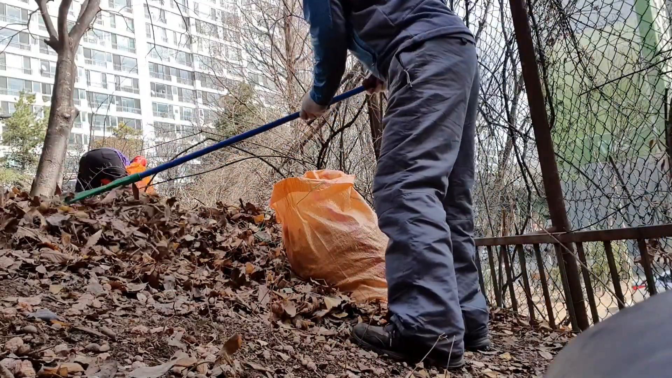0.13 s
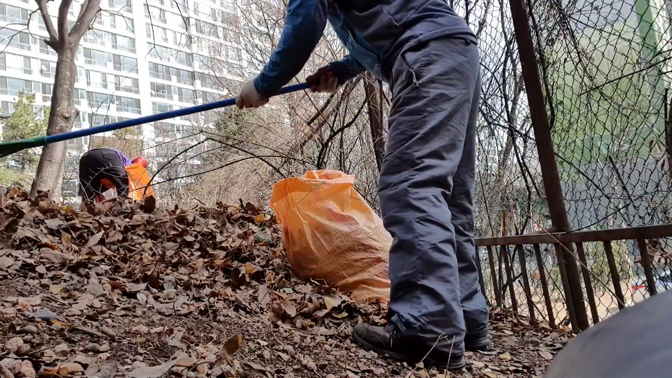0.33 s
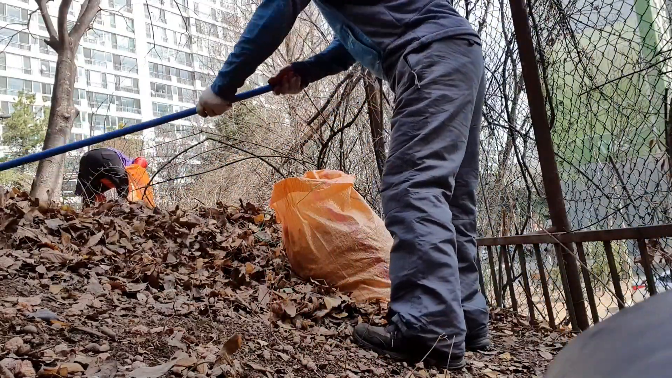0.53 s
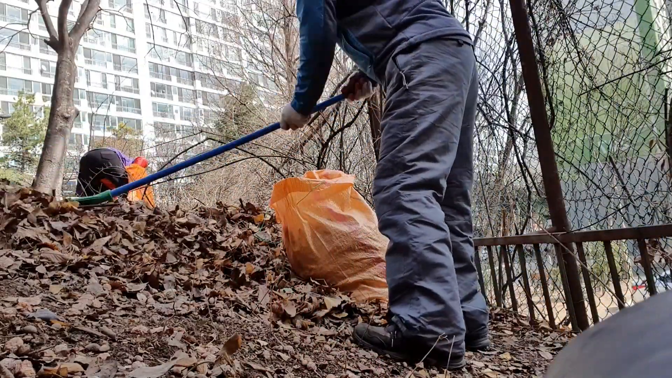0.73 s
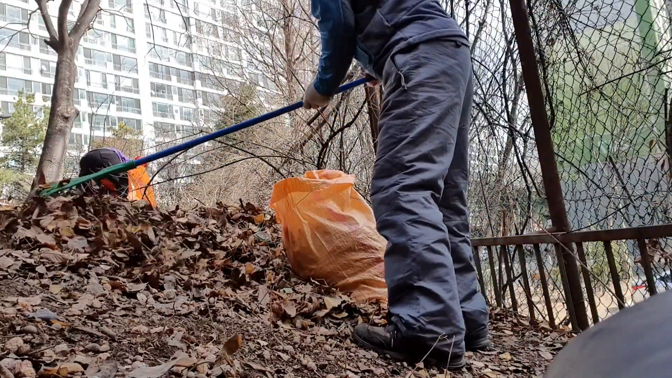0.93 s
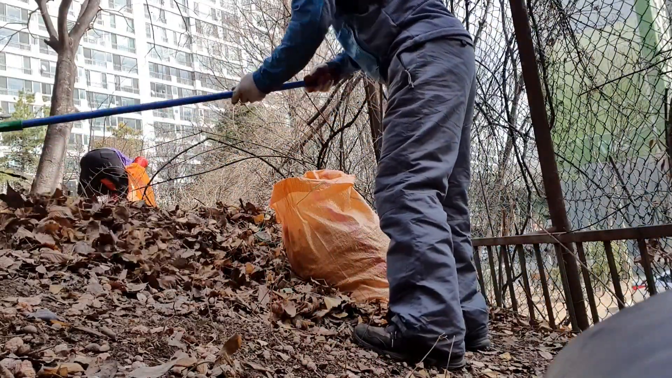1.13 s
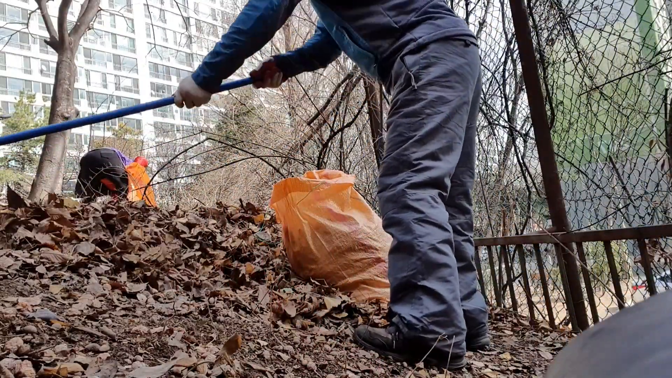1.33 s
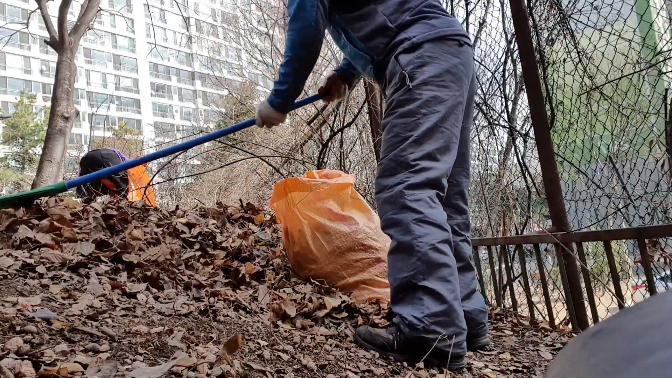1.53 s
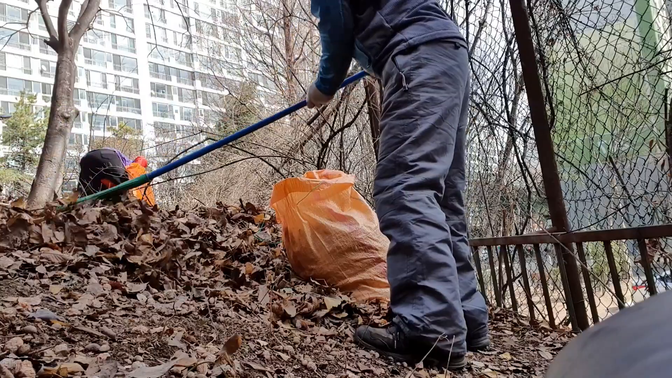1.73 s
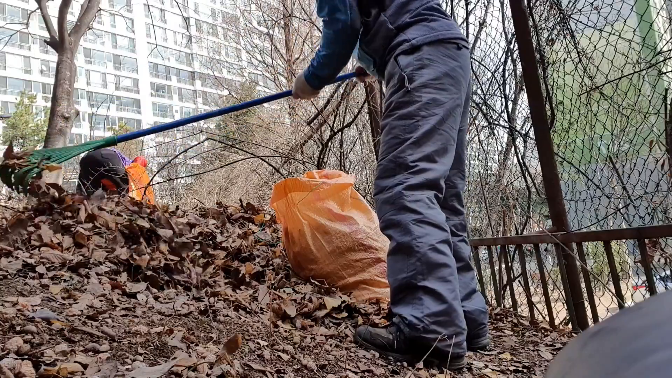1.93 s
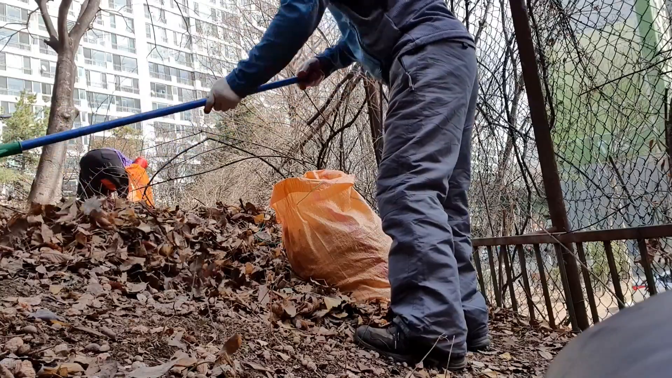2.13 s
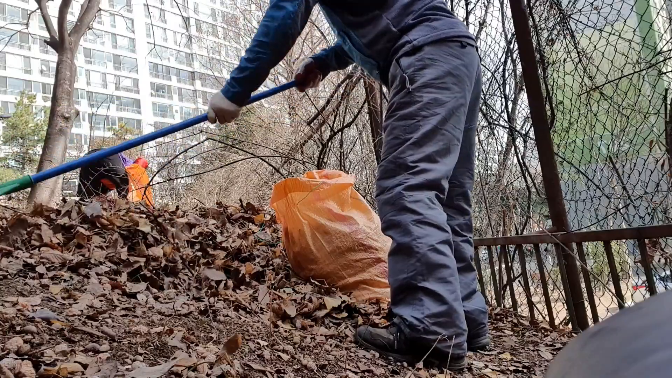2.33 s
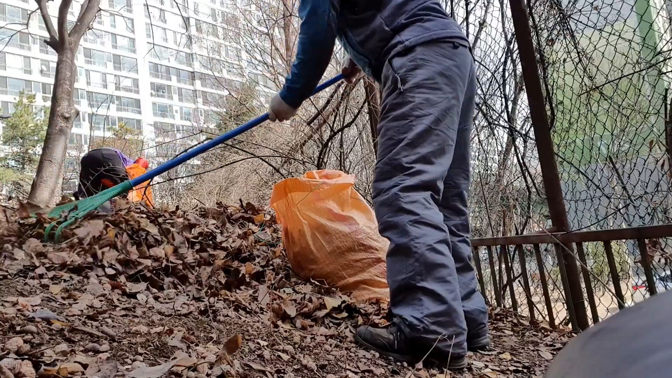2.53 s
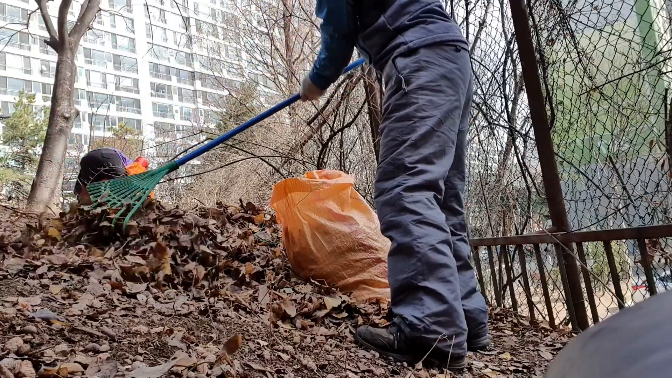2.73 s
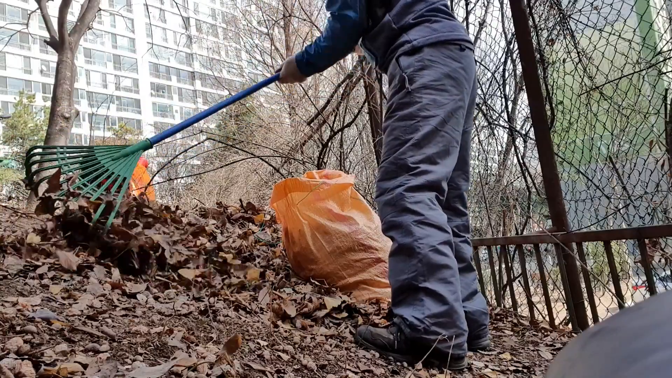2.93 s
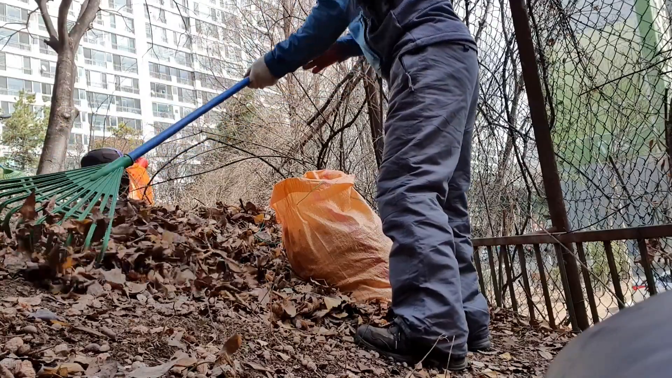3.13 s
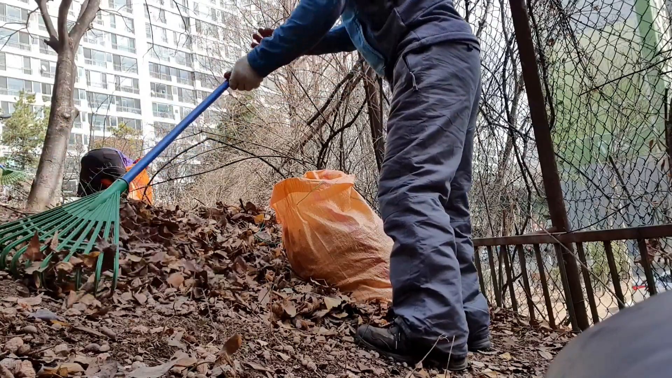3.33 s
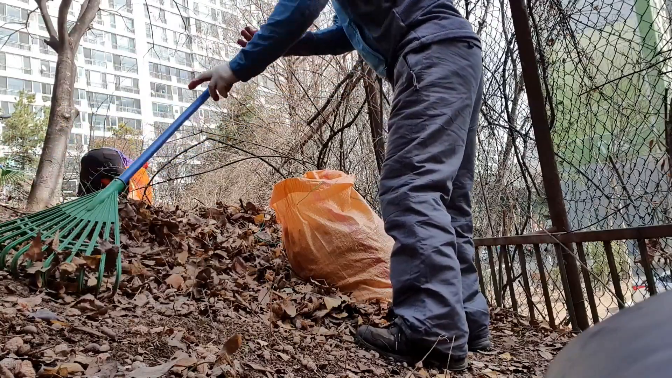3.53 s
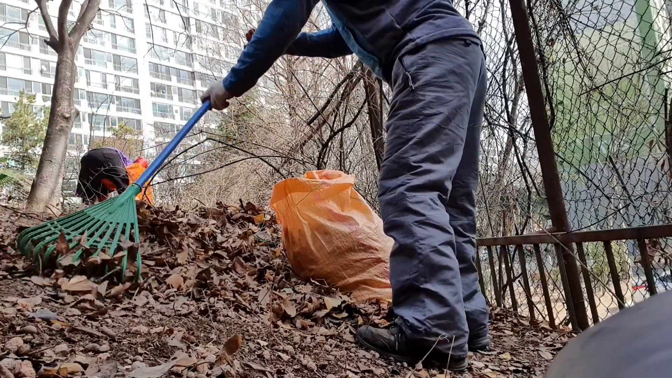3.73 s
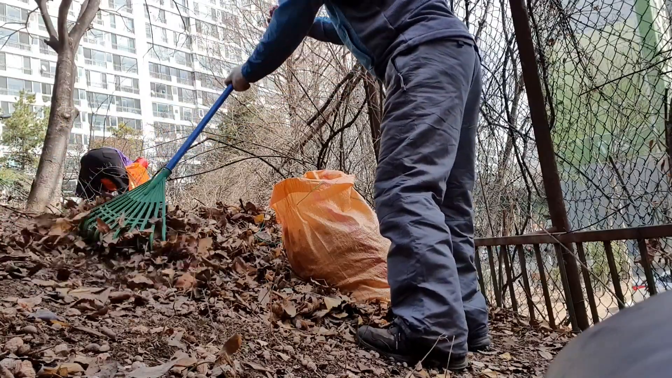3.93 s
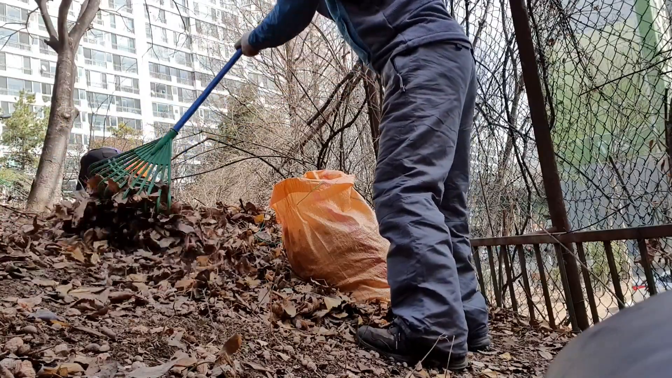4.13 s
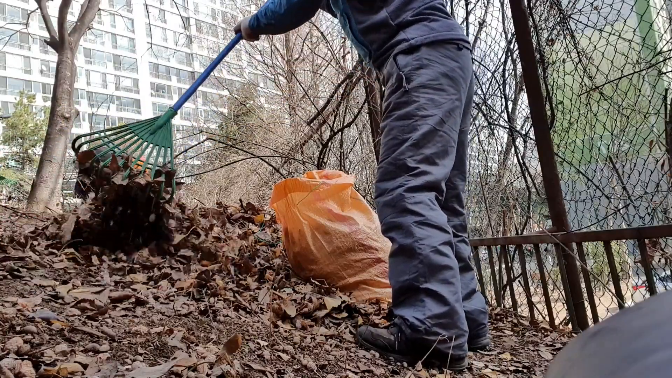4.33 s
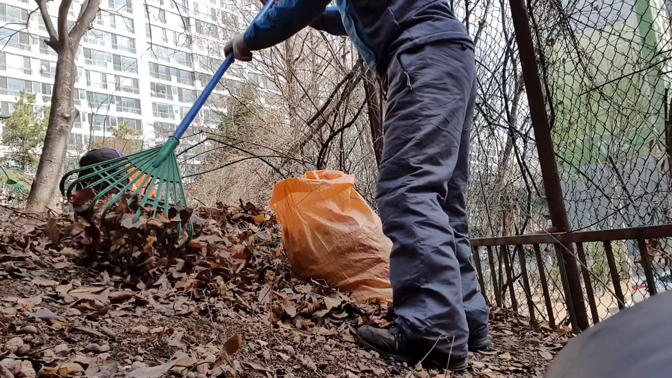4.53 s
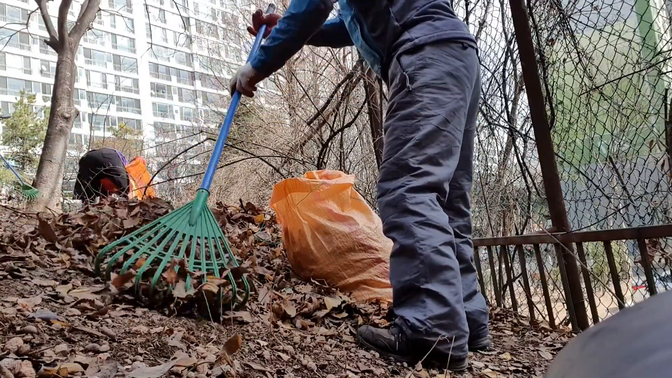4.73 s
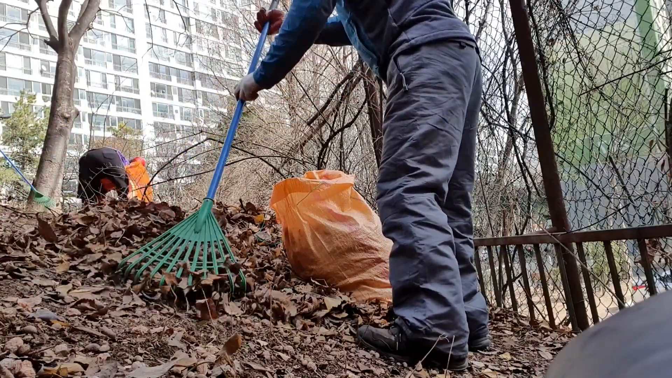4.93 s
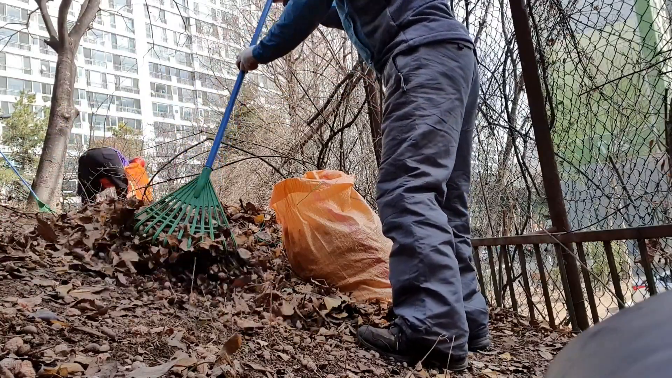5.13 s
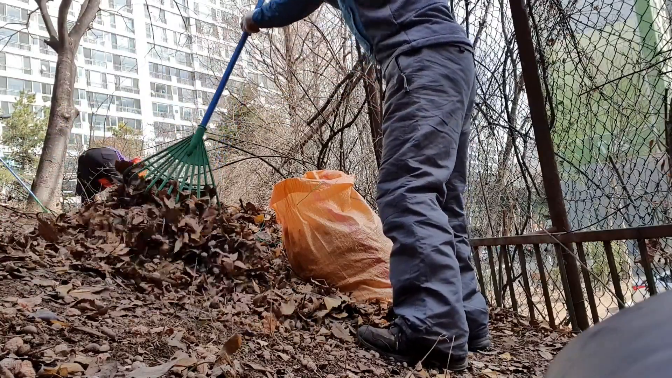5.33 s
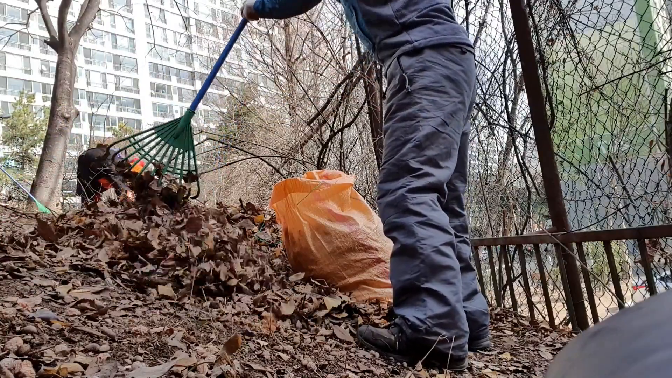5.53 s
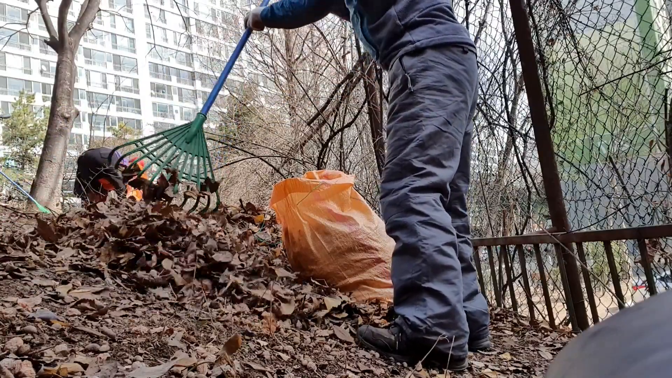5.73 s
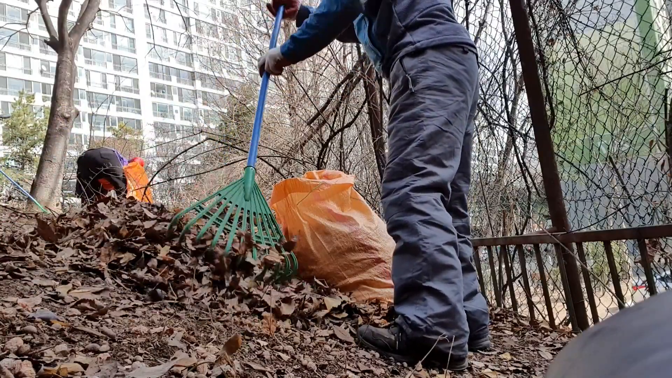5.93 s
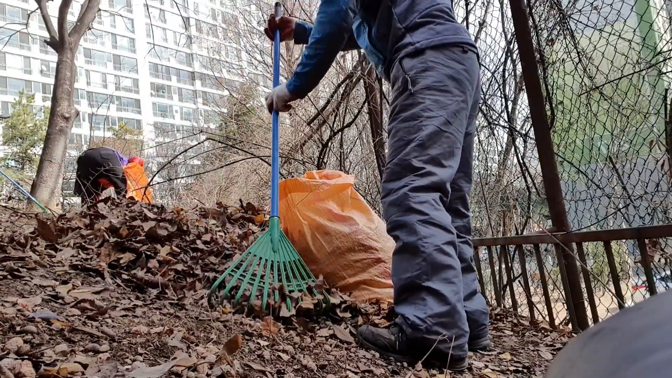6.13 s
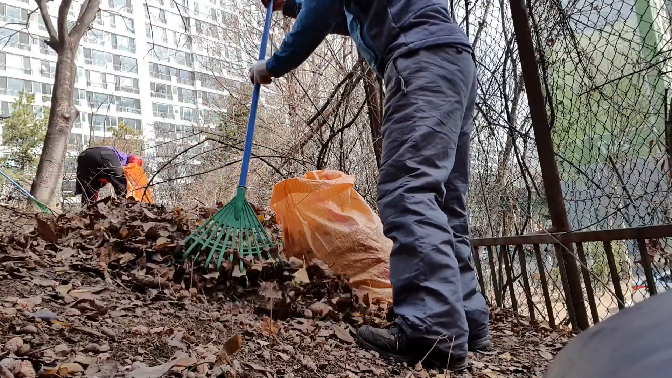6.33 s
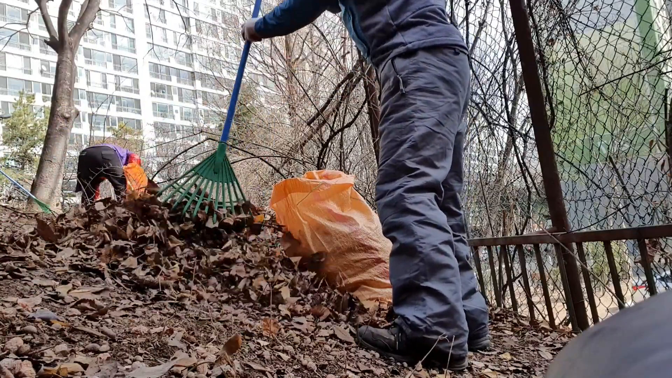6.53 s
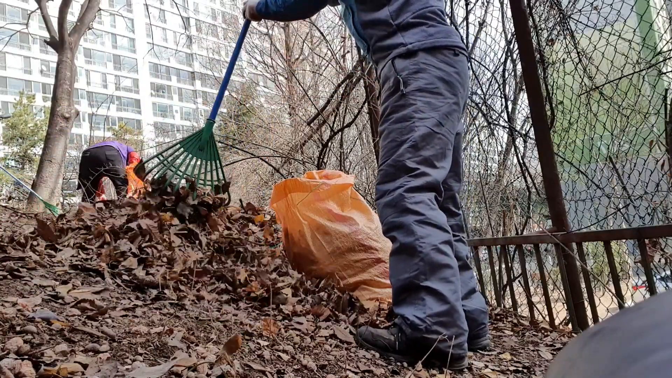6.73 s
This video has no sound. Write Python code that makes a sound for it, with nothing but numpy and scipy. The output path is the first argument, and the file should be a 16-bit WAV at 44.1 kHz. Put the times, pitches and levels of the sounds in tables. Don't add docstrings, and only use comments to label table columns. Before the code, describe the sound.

Outdoors on a leafy slope, a plastic rake pulls repeatedly through deep dry leaves. Each stroke bites with a crisp, dense crunch, then the leaves slide and settle. Sharp leaf snaps and a few dry tine knocks stand out. The rake is close to a small stereo microphone, leaning left, while traffic rumbles low far away beneath a throbbing engine drone.

```python
import sys
import numpy as np
from scipy import signal
from scipy.fft import rfft, irfft, next_fast_len
from scipy.io import wavfile
from scipy.ndimage import uniform_filter1d

SR = 44100
rng = np.random.default_rng(int(sys.argv[2]) if len(sys.argv) > 2 else 0)


def output_pcm(signal):
    pcm = np.clip(np.atleast_2d(signal).T, -1, 1) * 32767
    wavfile.write(sys.argv[1], SR, np.round(pcm).astype(np.int16))


def natural_amplitude(level_db):
    exponent = np.asarray(level_db, float) / 20
    return 10 ** exponent


N = 299680


def evened(x):
    return x / np.sqrt(np.mean(x ** 2) + 1e-20)


def read(points, hz):
    f, value = np.transpose(points)
    return np.interp(np.log(hz + 1), np.log(f + 1), value)


def along(rows):
    s, *columns = np.transpose(rows)
    return [np.interp(np.arange(N) / SR, s, column) for column in columns]


def shaped(x, gain):
    size = next_fast_len(N + 512)
    hz = np.fft.rfftfreq(size, 1 / SR)
    return irfft(rfft(x, size) * gain(hz), size)[..., :N]


def wandering(lowest_hz, usual_hz):
    return evened(shaped(rng.standard_normal(N), lambda hz: (hz > lowest_hz) / (1 + (hz / usual_hz) ** 2)))


def add(mix, s, sound):
    part = mix[round(s * SR):][:len(sound)]
    part += sound[:len(part)]


def at_ports(x, lag_ms):
    return np.array([x, shaped(x, lambda hz: np.exp(-2j * np.pi * hz * lag_ms / 1000))])


def total_db(*levels_db):
    return 10 * np.log10(sum(natural_amplitude(2 * db) for db in levels_db))


def swell(s, db, rise_s, fall_s):
    t = np.arange(N) / SR - s
    return np.maximum(db - 10 * np.where(t < 0, -t / rise_s, t / fall_s), -120)


# pitch in Hz, level in dB per Hz.
TRAFFIC_TONE = [(15, -50), (27, -23.5), (59, -6.5), (87, -10.5), (193, -11), (260, -12), (359, -23),
                (413, -22.5), (592, -24), (655, -26.5), (902, -34), (1170, -43), (3000, -67.5), (3900, -95),
                (6600, -120)]
# pitch in Hz, likeness from 0 to 1 (clipped to that).
TRAFFIC_LIKENESS = [(60, 0.96), (180, 0.91), (550, 0.28), (1650, -2.1), (4970, -0.1), (15000, 0.01)]
# time in seconds, pitch in Hz.
DRONE_PITCH = [(0, 56), (.19, 58), (.3, 46), (.45, 46), (.6, 64), (.78, 61), (.96, 71), (1.11, 62),
               (1.45, 70), (1.85, 66), (1.97, 53), (2.4, 53), (2.72, 59.2), (3.37, 61.3), (3.82, 61.1),
               (4.35, 56.5), (4.96, 52), (6.8, 47)]
# peak in seconds, level in dB, seconds to swell 10 dB, seconds to fade 10 dB.
DRONE_THROBS = [(.1, -33, .3, .15), (.28, -29, .1, .1), (.45, -26, .03, .06), (.74, -26, .03, .05),
                (1.0, -39, .05, .3), (1.3, -36, .3, .2), (2.06, -33, .04, .5), (2.36, -33, .5, .04),
                (2.5, -31, .04, .3), (2.91, -26, .16, .26), (3.37, -22.5, .04, .55), (3.88, -22, .05, .025),
                (4.03, -25.5, .03, .6), (4.28, -31, .3, .15), (5.02, -25, .03, .04), (5.34, -26, .1, .2),
                (5.83, -23, .02, .04), (6.17, -29, .08, .06), (6.28, -27, .02, .14)]


def town():
    traffic_db, traffic_swell_db, drone_trim_db = -38.5, 1.0, -10.0
    drift_db = traffic_swell_db * wandering(.2, 4)
    first, second = rng.standard_normal((2, N))
    same = lambda hz: np.clip(read(TRAFFIC_LIKENESS, hz), 0, 1)
    different = lambda hz: np.sqrt(1 - same(hz) ** 2)
    pair = np.array([first, shaped(first, same) + shaped(second, different)])
    toned = evened(shaped(pair, lambda hz: natural_amplitude(read(TRAFFIC_TONE, hz))))
    traffic = natural_amplitude(traffic_db + drift_db) * toned

    pitch_hz = along(DRONE_PITCH)[0]
    drone_db = total_db(*(swell(*row) for row in DRONE_THROBS)) + drone_trim_db
    drone = natural_amplitude(drone_db) * np.sqrt(2) * np.sin(2 * np.pi * np.cumsum(pitch_hz) / SR)
    return traffic + drone


# pitch in Hz, level in dB.
FAR_TONE = [(300, 8.5), (1300, 3), (2500, 1.5), (5000, 6.5), (8000, 5.5), (12000, 2.5), (15600, 2.5)]
# milliseconds added to the bounce,
# share of the weaker path, pitch in Hz where that share has halved.
PORT_BOUNCE = [(-0.0034, 0.55, 6500), (-.1, 0.74, 6500)]
# time in seconds, lag at the far opening in milliseconds.
RAKE_REACH = [(0, .2), (.6, .22), (.65, .34), (.95, .23), (1.45, .22), (1.5, .35), (1.8, .26), (2, .22),
              (2.34, .24), (2.4, .36), (2.5, .33), (2.8, .19), (3.73, .2), (3.8, .28), (4.05, .2),
              (4.6, .14), (5, .16), (5.8, .14)]


def paths(near):
    usual_bounce_ms, near_lag_ms, shortening = .51, .2, 3.2
    hz, t, z = signal.stft(near, SR, nperseg=512, noverlap=384)
    late = lambda ms: np.exp(-2j * np.pi * np.outer(hz, ms) / 1000)

    wander_ms = .012 * wandering(.3, 8)
    lag_ms = np.interp(t, *np.transpose(RAKE_REACH))
    bounce_ms = usual_bounce_ms - shortening * np.maximum(lag_ms - near_lag_ms, 0) ** 2
    bounce_ms = bounce_ms + np.interp(t, np.arange(N) / SR, wander_ms)

    weaker = [(share / (1 + (hz / half_hz) ** 2))[:, None] for _, share, half_hz in PORT_BOUNCE]
    left = 1 + weaker[0] * late(bounce_ms + PORT_BOUNCE[0][0])
    right = weaker[1] + late(bounce_ms + PORT_BOUNCE[1][0])
    right = right * late(lag_ms) * natural_amplitude(read(FAR_TONE, hz))[:, None]
    return signal.istft(z * np.array([left, right]), SR, nperseg=512, noverlap=384)[1][:, :N]


# start in seconds, peak level in dB, ring pitch in Hz,
# seconds for the ring to fade by 60 dB.
TINE_KNOCKS = [
    (.6412, -39, 1500, .004),
    (1.4757, -26, 700, .005),
    (2.4684, -24, 1370, 0.0042),
    (2.5158, -21, 2220, .004),
    (3.189, -38, 1890, 0.0036),
    (3.45, -43, 1200, 0.0038),
    (3.6963, -27.5, 1090, 0.0032),
    (6.2238, -38, 1298, 0.0034),
    (6.3058, -27, 1250, 0.0095),
]


def knocks():
    t, out = np.arange(2000) / SR, np.zeros(N)
    for s, db, ring_hz, fade_s in TINE_KNOCKS:
        ring = natural_amplitude(-60 * t / fade_s) * np.sin(2 * np.pi * ring_hz * t)
        thud = natural_amplitude(-11.5 - 60 * t / 0.011) * np.sin(2 * np.pi * 520 * t)
        add(out, s, natural_amplitude(db + 4.0) * (ring - thud))
    return np.array([out, out])


# start in seconds, peak level in dB, middle pitch in Hz.
LEAF_SNAPS = [(0.6344, -30, 11300), (0.6474, -31, 11000), (0.653, -34, 12100), (0.7801, -22.5, 10600),
              (1.4402, -36, 7750), (1.4751, -30, 12600), (1.5623, -22, 13100), (1.5744, -17, 12600),
              (1.5845, -15, 10500), (1.625, -13, 12700), (2.2469, -31, 10250), (2.3012, -32, 11530),
              (2.378, -19.3, 13200), (2.384, -19, 12800), (2.4547, -28, 13000), (2.5064, -21, 10300),
              (2.516, -15.5, 11500), (2.6124, -21, 11180), (2.6788, -19.5, 11600), (3.4237, -23, 11460),
              (3.7927, -30.8, 12200), (3.811, -19, 11000), (3.815, -17.5, 10030), (3.958, -16.6, 12840),
              (3.971, -15, 13300), (4.3069, -25.1, 11500), (5.0029, -19.5, 11200), (5.1193, -20.5, 9700),
              (6.2237, -27, 9840), (6.3056, -18.9, 13100)]


def snaps():
    fade_s, onset_s = .008, .0003
    t, hz, out = np.arange(2000) / SR, np.fft.rfftfreq(2000, 1 / SR), np.zeros(N)
    for s, db, middle_hz in LEAF_SNAPS:
        hump = .08 + np.exp(-((hz - middle_hz) / 4500) ** 2)
        noise = rng.standard_normal(2000)
        burst = evened(irfft(rfft(noise) * hump * (hz > 1500)))
        burst = burst * (1 - np.exp(-t / onset_s))
        add(out, s, natural_amplitude(db - 1.5 - 60 * t / fade_s) * burst)
    return at_ports(out, 0.042) * natural_amplitude([[2.6], [-2.6]])


# tines bite in seconds, tines lift in seconds, leaves stop sliding in seconds,
# crackle while dragged in dB, crackle while sliding in dB.
PULLS = [
    (-.3, .0, .38, -44, -42),
    (.705, .84, 1.17, -40, -40.5),
    (1.535, 1.79, 2.2, -32, -43.5),
    (2.456, 2.71, 3.36, -34, -39.5),
    (3.795, 4.07, 4.92, -34, -40.5),
    (4.975, 5.19, 5.74, -37, -37.5),
    (6.22, 6.47, 6.72, -39, -38.5),
]
# peak in seconds, crackle in dB, seconds to swell 10 dB,
# seconds to fade 10 dB, scrape compared with crackle in dB.
CLUMPS = [(0, -41, .05, .08, -10), (.6355, -40, .0008, .03, -11), (.796, -34.5, .04, .025, -12),
          (1.479, -39.5, .005, .09, -10), (1.577, -31, .03, .03, -20), (1.629, -26.5, .02, .04, -17),
          (2.384, -44, .015, .015, -16), (2.456, -40, .0008, .06, -10), (2.557, -29, .055, .06, -17),
          (2.681, -30, .02, .015, -18), (3.211, -33.5, .15, .1, -19), (3.414, -35.5, .05, .04, -10),
          (3.79, -43, .07, .03, -10), (3.82, -33, .015, .1, -14), (3.969, -29, .1, .03, -13),
          (4.673, -32.5, .25, .07, -21), (4.921, -36, .14, .1, -14), (5.021, -30, .03, .1, -9),
          (5.14, -31, .04, .07, -11), (5.445, -37, .15, .07, -14), (5.749, -39, .2, .1, -14),
          (6.226, -39, .002, .05, -8), (6.287, -32.5, .04, .1, -14), (6.45, -36, .1, .2, -9)]


def motion():
    bite_s, let_go_db_per_s, settle_db_per_s = .035, 50, 42
    tines_db, tines_lift_db_per_s, slide_scrape_db = -44.5, 45, -16.5
    t = np.arange(N) / SR
    crackle, scrape = [-56], [-61]
    for bite, lift, stop, drag_db, slide_db in PULLS:
        grip_db = 20 * np.log10(1 - np.exp(-np.maximum(t - bite, 0) / bite_s) + 1e-5)
        since_lift = np.maximum(t - lift, 0)
        sliding_db = grip_db + slide_db - settle_db_per_s * np.maximum(t - stop, 0)
        crackle += [grip_db + drag_db - let_go_db_per_s * since_lift, sliding_db]
        scrape += [grip_db + tines_db - tines_lift_db_per_s * since_lift, sliding_db + slide_scrape_db]
    for s, db, rise_s, fall_s, scrape_db in CLUMPS:
        surge_db = swell(s, db, rise_s, fall_s)
        crackle.append(surge_db)
        scrape.append(surge_db + scrape_db)
    crackle_db = total_db(*crackle)
    pan_db = 5 + .08 * (crackle_db - crackle_db.mean())
    return crackle_db, total_db(*scrape), pan_db


def crumple(per_s, spread_db, burst_ms, clump_db, width_ms, count=7):
    clumps = natural_amplitude(clump_db * evened(uniform_filter1d(rng.standard_normal(N), 700)))
    keep = np.exp(-1000 / (burst_ms * SR))
    out = np.zeros((2, N))
    for lag_ms in width_ms * np.linspace(-1, 1, count) ** 3:
        chance, size, noise = rng.random(N), rng.exponential(1, N), rng.standard_normal(N)
        breaks = (chance < per_s / count / SR) * natural_amplitude(2 * spread_db * np.minimum(size, 4))
        power = signal.lfilter([1], [1, -keep], breaks)
        out += at_ports(np.sqrt(power) * noise, lag_ms)
    return out * clumps


# pitch in Hz, level in dB.
LEAF_TONE = [(700, -17), (1500, -11.5), (3000, -7.5), (5000, -3.5), (7500, -4), (9500, -3.5), (11500, 2.5),
             (13500, 1), (15000, 2), (15800, 4)]
# pitch in Hz, level in dB.
TINE_TONE = [(150, -34), (350, 1), (700, -2), (1300, 0), (2200, -9), (3500, -6), (6000, -35)]


def rake():
    crackle_db, scrape_db, pan_db = motion()
    rustle = crumple(per_s=8300, spread_db=-2.0, burst_ms=1.0, clump_db=1.0, width_ms=0.303)
    crackles = crumple(per_s=300, spread_db=2.5, burst_ms=1.2, clump_db=0, width_ms=.2)
    tines = crumple(per_s=900, spread_db=3.0, burst_ms=2.75, clump_db=-0.6, width_ms=0.28)

    leaves = evened(rustle) + natural_amplitude(-7.5) * evened(crackles)
    leaves = evened(shaped(leaves, lambda hz: natural_amplitude(read(LEAF_TONE, hz))))
    leaves = leaves * natural_amplitude(crackle_db - 3.4)
    tines = evened(shaped(tines, lambda hz: natural_amplitude(read(TINE_TONE, hz))))
    tines = tines * natural_amplitude(scrape_db + 2.4)

    leaves_side_db = np.outer([.5, -.5], pan_db + 3.0) + 5.5
    tines_side_db = np.outer([.25, -.25], pan_db + 6.0)
    return leaves * natural_amplitude(leaves_side_db) + tines * natural_amplitude(tines_side_db)


def scene():
    background = natural_amplitude(3.0) * town()
    return background + paths(knocks() + snaps() + rake())


def roll_off(x):
    return signal.sosfilt(signal.butter(12, 17020, fs=SR, output="sos"), x)


def record(dry):
    limited = shaped(dry, lambda hz: natural_amplitude(-90 * np.clip((hz - 15800) / 330, 0, 1)))
    return roll_off(limited)


dry = scene()
out = record(dry)
output_pcm(out)
```